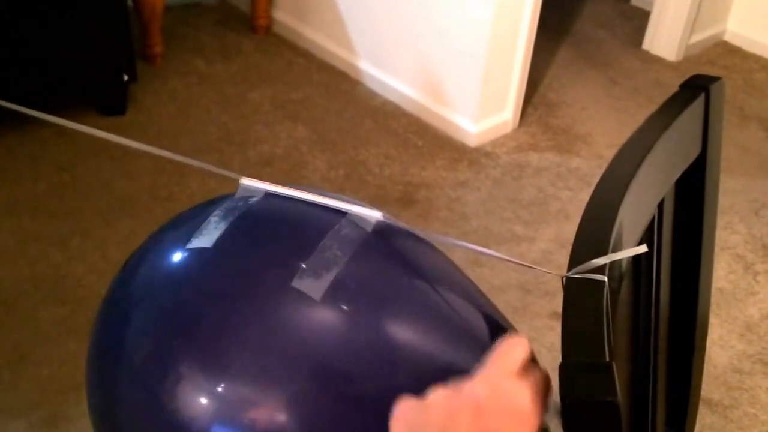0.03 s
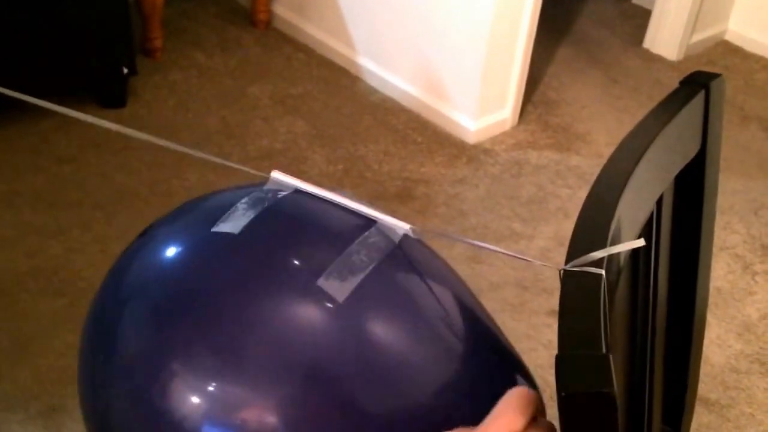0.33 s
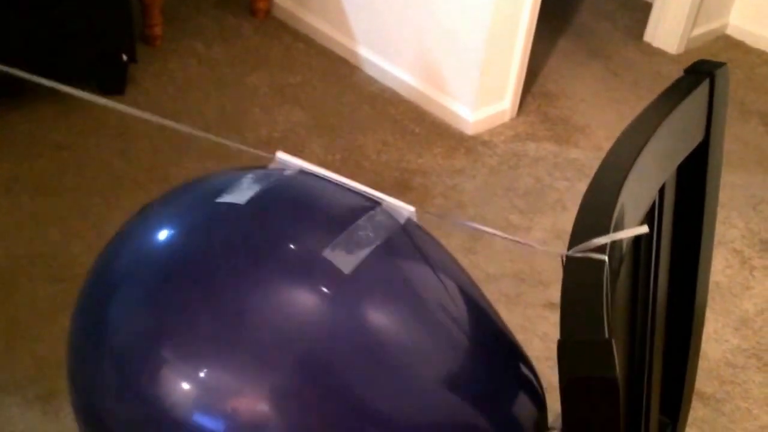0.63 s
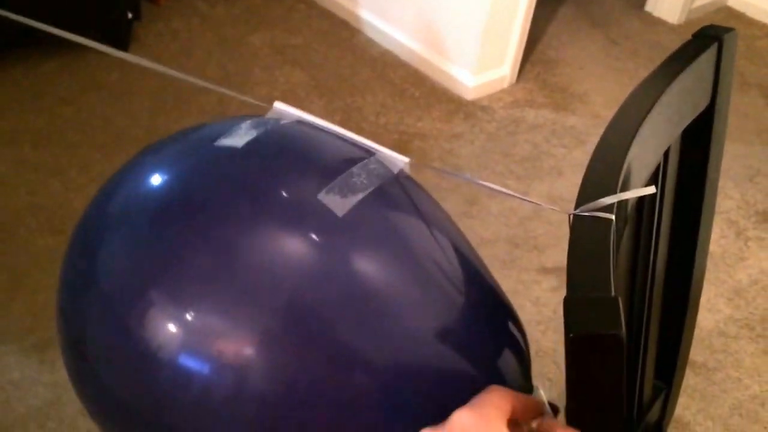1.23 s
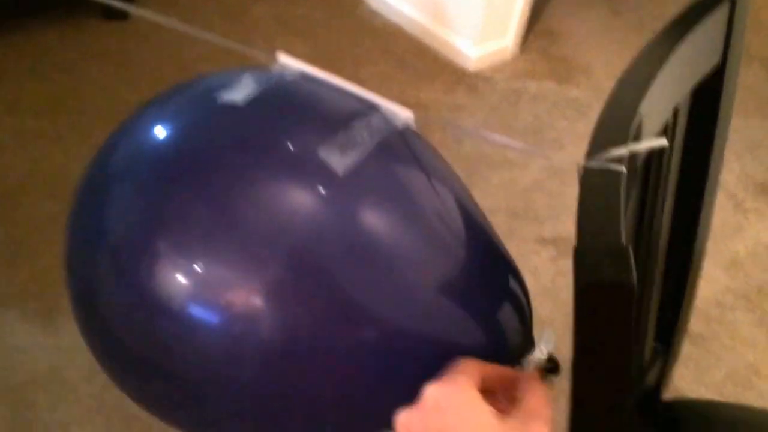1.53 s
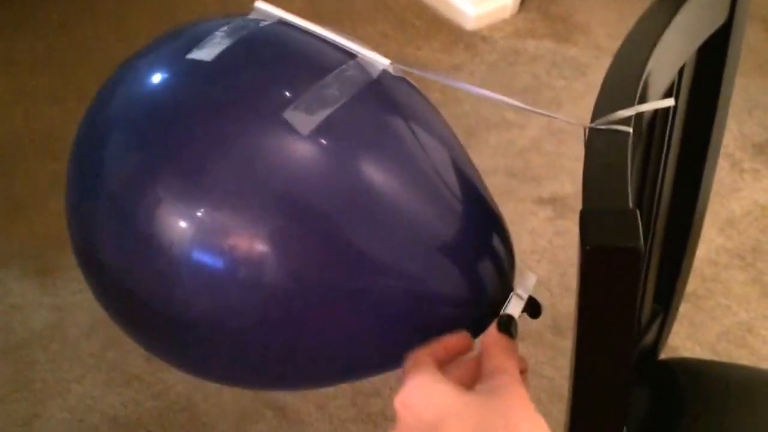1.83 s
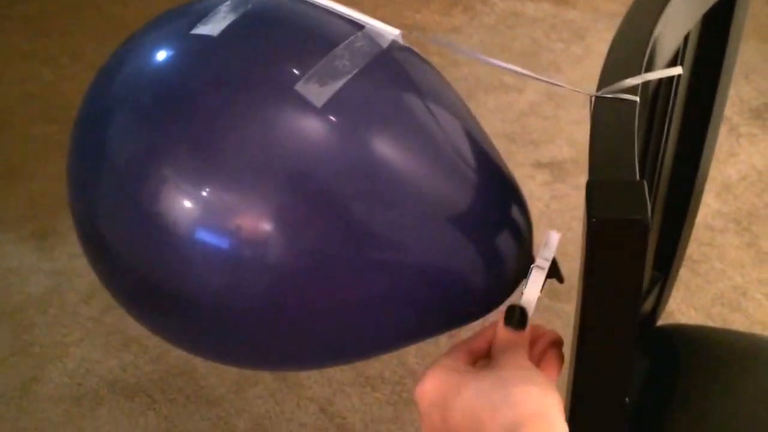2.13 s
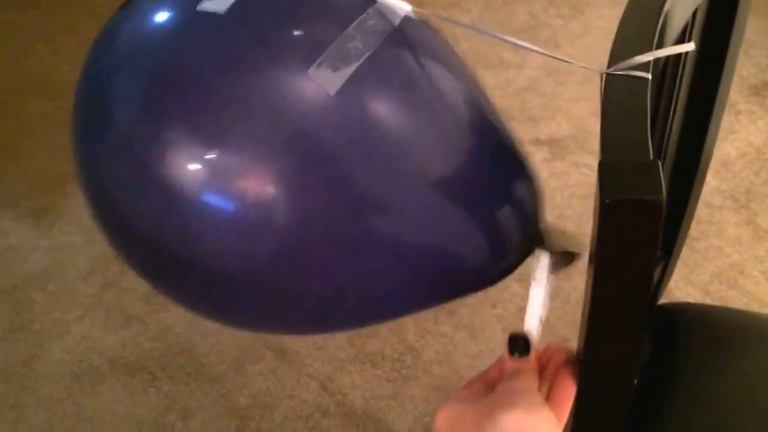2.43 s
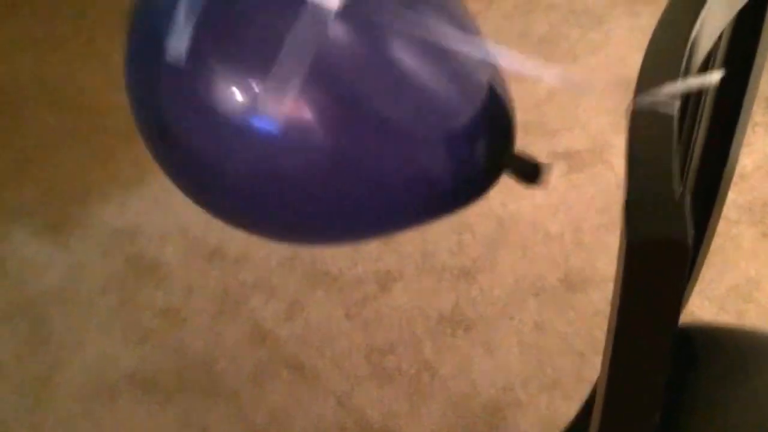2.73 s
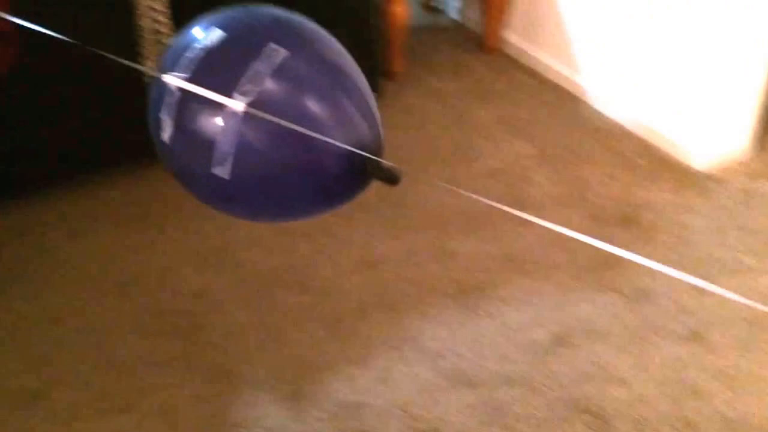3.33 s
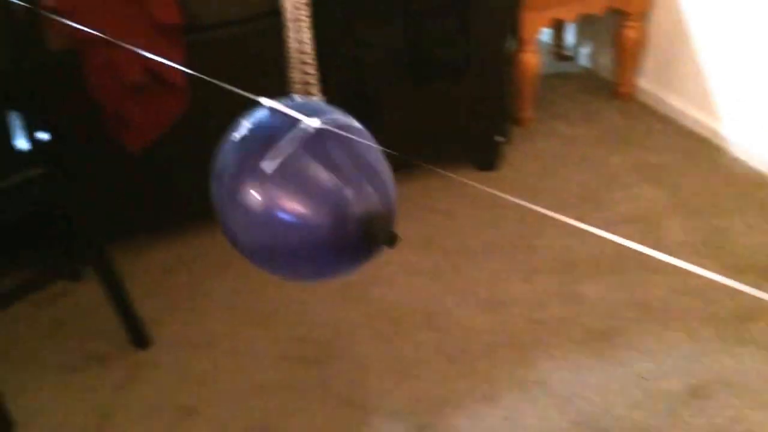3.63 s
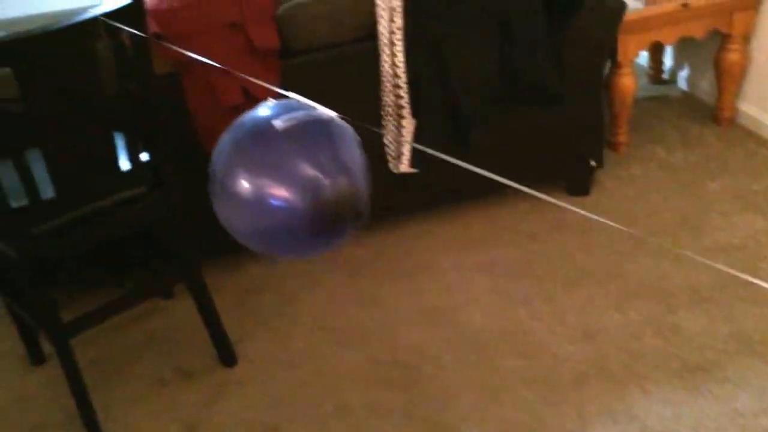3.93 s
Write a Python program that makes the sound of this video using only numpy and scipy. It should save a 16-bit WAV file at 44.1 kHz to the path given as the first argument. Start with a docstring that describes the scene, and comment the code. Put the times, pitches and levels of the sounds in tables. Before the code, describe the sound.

A balloon deflates with a sudden loud hiss and a rapid, raspy flutter that sinks in pitch. Before the release, fingers softly rub, tap and creak on the rubber, heard close up in a quiet room.

```python
"""A quiet carpeted room, where a balloon taped to a straw hangs on a string. Fingers handle it and unclip
its peg: friction makes the rubber rub, creak and squeak, and knocks excite the modes of the skin and
the air inside. The neck pops open and a turbulent jet hisses out. Then the loose neck flutters some
45 times a second, each flap a crack and a thump, sinking in pitch as the balloon empties."""
import sys
import numpy as np
from scipy import signal
from scipy.fft import rfft, irfft, next_fast_len
from scipy.io import wavfile
from scipy.ndimage import map_coordinates

SR = 44100
rng = np.random.default_rng(int(sys.argv[2]) if len(sys.argv) > 2 else 0)


def store_wav(level_fs):
    """Save 16-bit WAV to argv[1]."""
    pcm = np.round(np.clip(np.atleast_2d(level_fs), -1, 1) * 32767)
    wavfile.write(sys.argv[1], SR, pcm.T.astype(np.int16))


N = 176400
TIME = np.arange(N) / SR
POP_S, FLUTTER_START_S = 2.512, 2.653


def amp(db):
    """Amplitude ratio of a level in decibels."""
    return 10 ** (np.asarray(db) / 20)

def unit(x):
    """Normalisation to rms 1."""
    return x / np.sqrt(np.mean(x ** 2) + 1e-20)

def decay(t, t60_s):
    """Exponential damping, 60 dB in t60_s."""
    return np.exp(-np.log(1000) * t / t60_s)

def along(points, hz):
    """Interpolation of (frequency_hz, value) points on a logarithmic axis."""
    knots_hz, values = np.transpose(points)
    return np.interp(np.log(hz + 1), np.log(knots_hz + 1), values)

def curves(rows, t):
    """Linear interpolation in time of each column after the first."""
    times, *columns = np.transpose(rows)
    return [np.interp(t, times, column) for column in columns]

def wobble(rate_hz):
    """Random modulation: a spline through rate_hz Gaussian values a second."""
    knots = rng.standard_normal(int(N * rate_hz / SR) + 4)
    return map_coordinates(knots, [np.arange(N) * rate_hz / SR])

def filtered(x, response):
    """Linear filtering: the spectrum times a frequency response."""
    size = next_fast_len(N + SR // 2)
    return irfft(rfft(x, size) * response(np.fft.rfftfreq(size, 1 / SR)), size)[:N]

def resonant(x, modes):
    """Forced response of damped resonators in parallel."""
    return filtered(x, lambda f: sum(amp(db) * 1j * f * width / (hz ** 2 - f ** 2 + 1j * f * width)
                                     for hz, width, db in modes))

def coloured(x, spectrum, size=4096):
    """Minimum-phase filtering that keeps the power of white noise."""
    cepstrum = irfft(np.log(amp(along(spectrum, np.fft.rfftfreq(size, 1 / SR)))))
    cepstrum[1:size // 2] *= 2
    cepstrum[size // 2 + 1:] = 0
    impulse = irfft(np.exp(rfft(cepstrum)))
    return signal.fftconvolve(x, impulse / np.linalg.norm(impulse))[:N]

def noise(spectrum):
    """Coloured Gaussian noise of rms 1."""
    return unit(coloured(rng.standard_normal(N), spectrum))

def add(track, start_s, x):
    """Superposition of x on the track from start_s."""
    part = track[max(0, round(start_s * SR)):][:len(x)]
    part += x[:len(part)]

def burst(decay_s, size=1024):
    """A noise transient with the energy of its exponential envelope."""
    envelope = np.exp(-np.arange(size) / SR / decay_s)
    puff = envelope * rng.standard_normal(size)
    return puff * np.linalg.norm(envelope) / np.linalg.norm(puff)


# Background spectrum: frequency_hz, level_db
AMBIENT_SPECTRUM = [(15, -73), (25, -5), (90, -2.5), (264, -7), (415, -6.5), (621, -25), (903, -25.5),
                    (1670, -24), (7480, -27.5), (15000, -33)]

def ambience():
    """Stationary noise, mostly low, sets the room's noise floor."""
    return amp(-70.5) * noise(AMBIENT_SPECTRUM)


# Reverberation times: frequency_hz, t60_s
ROOM_DECAY = [(150, 0.57), (600, 0.33), (3000, 0.45), (7000, 0.31), (12000, 0.19)]

def reverberation(x):
    """Absorption damps the diffuse field, fastest in the high treble."""
    hz, t, spectra = signal.stft(rng.standard_normal(SR // 2), SR, nperseg=256)
    absorption = amp(-60 * t / along(ROOM_DECAY, hz)[:, None])
    tail = signal.istft(spectra * absorption, SR, nperseg=256)[1]
    tail = np.pad(tail, (SR // 200, 0))  # reflections arrive after 5 ms
    return signal.fftconvolve(x, tail / np.linalg.norm(tail))[:N]


# Strength of the rubbing: time_s, level_db
RUB_LEVELS = [(0.0, -69), (0.14, -50.5), (0.3, -63), (0.63, -51.5), (0.72, -57), (0.92, -58), (0.94, -50),
              (0.99, -40), (1.1, -62), (1.41, -56.5), (1.6, -67), (1.64, -63.5), (1.85, -53.5),
              (2.05, -61.5), (2.21, -57.5), (2.27, -61), (2.37, -52), (2.48, -42.5)]
# Friction spectrum: frequency_hz, level_db
RUB_SPECTRUM = [(25, -6), (80, 7), (200, 2.5), (280, -2), (420, -3.5), (650, -11), (1000, -9.5),
                (2000, -20.5), (6000, -25.5), (15000, -30)]
# Modes of the enclosed air: frequency_hz, bandwidth_hz, gain_db
CAVITY_MODES = [(353, 17, 1), (415.3, 20.6, 8.5), (505, 35, 3.5), (700, 26, 2.5), (910, 80, -2)]

def rubbing():
    """Uneven sliding friction of fingers on rubber drives the cavity resonances."""
    level_db, = curves(RUB_LEVELS, TIME)
    friction = unit(noise(RUB_SPECTRUM) * amp(2.76 * wobble(70)))
    rub = amp(level_db - 4.5) * friction * (TIME < POP_S)
    return rub + resonant(rub, CAVITY_MODES)


# Fingertip creaks: centre_s, half_length_s, level_db, pitch_hz
CREAK_EVENTS = [(0.159, 0.06, -64, 8800), (0.219, 0.0079, -60, 5300), (.26, 0.023, -60.5, 3500),
                (0.454, 0.032, -62, 3540), (0.638, 0.034, -58, 5870), (0.752, 0.022, -63, 5240),
                (0.94, 0.026, -60, 3250), (0.997, 0.013, -38.5, 7500), (1.275, 0.011, -65.5, 7600),
                (1.373, 0.015, -62, 4550), (1.708, 0.044, -71.5, 7250), (1.862, 0.061, -71, 5600),
                (1.97, 0.031, -62, 5100), (2.211, 0.033, -62, 5960), (2.437, 0.032, -81, 4000)]
# Spectrum of a creak: pitch_ratio, level_db
CREAK_SPECTRUM = [(.15, -3), (.7, -7), (1, -4.5), (1.3, -7), (2, -10.5), (4, -28)]

def creaks(slips_per_s=1600):
    """Stick-slip friction: a fingertip releases a short swell of tiny random impulses."""
    out = np.zeros(N)
    for centre_s, half_s, db, hz in CREAK_EVENTS:
        size = int(2 * half_s * SR)
        slips = rng.standard_normal(SR) * (0.11 + (rng.random(SR) < slips_per_s / SR))
        swell = unit(slips[:size]) * np.hanning(size)
        add(out, centre_s - half_s, amp(db) * coloured(swell, np.multiply(CREAK_SPECTRUM, [hz, 1])))
    return out


# Fingertip squeaks: start_s, length_s, level_db, pitch_hz
SQUEAK_EVENTS = [(0.428, 0.06, -68, 3160), (0.596, 0.018, -57, 5650), (0.736, 0.036, -72, 3140),
                 (0.938, 0.02, -63, 3000)]

def squeaks(bandwidth_hz=600, attack_s=0.003):
    """Friction-excited vibration: random modulation widens the rubber's tone into a rough, narrow band."""
    out = np.zeros(N)
    for start_s, length_s, db, hz in SQUEAK_EVENTS:
        t = TIME[:int(3 * length_s * SR)]
        grip = (wobble(bandwidth_hz) + 1j * wobble(bandwidth_hz))[:len(t)]
        tone = np.real(grip * np.exp(2j * np.pi * hz * t))
        envelope = (1 - np.exp(-t / attack_s)) * np.exp(-(t / length_s) ** 4)
        add(out, start_s, amp(db) * envelope * tone)
    return out


# Finger knocks, and near 0.98-1.0 s the low thumps of the peg snapping: start_s, level_db, pitch_hz
KNOCK_EVENTS = [(0.095, -41.5, 876), (.162, -30.5, 842), (.175, -36.5, 420), (0.198, -44, 443),
                (.466, -49, 1380), (.534, -48, 840), (0.83, -50, 1010), (.949, -28.5, 894),
                (.983, -36, 460), (0.993, -25.5, 387), (.996, -26.5, 221), (1.195, -46.5, 377),
                (1.253, -51, 365), (1.379, -45, 430), (1.646, -47, 385), (1.722, -45, 355),
                (1.84, -47, 374), (1.981, -47, 418), (2.223, -50, 930), (2.285, -30, 423),
                (2.386, -39, 402), (2.429, -34.5, 485), (2.468, -34, 450), (2.555, -19, 372)]
# Modes of the taut skin: pitch_ratio, level_db, t60_s
SKIN_MODES = [(1.002, -2, 0.028), (.5, -31, 0.072), (1.27, -16, 0.05), (1.6, -8.5, 0.01),
              (2.299, -21, 0.037), (3.698, -21.5, 0.016)]
# Spectrum of a knock's thud: frequency_hz, level_db
THUD_SPECTRUM = [(40, -2), (100, -0.5), (260, -9), (450, 10), (1100, -13.5), (2200, -17), (3300, -27),
                 (6000, -29), (15000, -40)]

def knocks():
    """Impact excites damped membrane modes over a dull thud; the enclosed air rings on in sympathy."""
    ring, thud = np.zeros((2, N))
    t = TIME[:SR // 5]
    for start_s, db, hz in KNOCK_EVENTS:
        for ratio, mode_db, t60_s in SKIN_MODES:
            strength = amp(db + mode_db + rng.normal(0, 0.5)) * rng.choice([-1, 1])
            add(ring, start_s, strength * decay(t, t60_s) * np.sin(2 * np.pi * hz * ratio * t))
        add(thud, start_s, amp(db - 7.5) * decay(t, t60_s=0.059) * rng.standard_normal(len(t)))
    return ring + amp(-12) * resonant(ring, CAVITY_MODES) + coloured(thud, THUD_SPECTRUM)


# Snaps of peg and rubber, and two sharp snaps of the neck as it starts to flap (2.6534 s, 2.726 s): start_s,
# level_db, pitch_hz
SNAP_EVENTS = [(0.6, -36, 5840), (.635, -45, 6400), (0.739, -52, 7700), (0.9927, -19, 6770),
               (2.224, -59, 5600), (2.283, -48.5, 3420), (2.285, -46.5, 7900), (2.6534, -13.5, 7100),
               (2.726, -13, 5960), (3.36, -24, 9200)]
# Spectrum of a snap: pitch_ratio, level_db
SNAP_SPECTRUM = [(.04, -4), (.4, -7), (.75, -10.5), (.88, 6), (1.1, 7), (1.25, -11), (1.42, -0.5),
                 (1.9, -4.5), (2.2, -9)]

def snaps():
    """Impulsive excitation: a very short click has a broad spectrum, here peaking near its pitch."""
    out = np.zeros(N)
    for start_s, db, hz in SNAP_EVENTS:
        click = burst(decay_s=0.00043)
        click[0] += 4  # sharp leading edge
        add(out, start_s, amp(db - 1.5) * coloured(click, np.multiply(SNAP_SPECTRUM, [hz, 1])))
    return out


# Strength of the jet: time_s, hiss_db, roar_db
JET_LEVELS = [(2.425, -77, -60), (2.486, -69, -40), (2.51, -25, -23), (2.57, -25, -26), (2.64, -29, -30.5),
              (2.68, -30.5, -29.5), (2.85, -34.5, -33), (3.1, -36, -35.5), (3.35, -40.5, -38),
              (3.62, -44, -41.5), (3.94, -41, -48), (4.0, -45, -44)]
# Spurts as the neck opens: centre_s, level_db, width_s
JET_SPURTS = [(2.511, -18.5, 0.00091), (2.524, -22, 0.0012), (2.586, -30.5, 0.0056), (2.626, -25, 0.0028)]
# Spectra of the hiss, the first rush and the roar: frequency_hz, level_db
HISS_SPECTRUM = [(500, -45.5), (1500, -6.5), (2700, -7.5), (3600, -1), (4600, 3), (5700, -3.5),
                 (7300, -6.5), (9500, -9.5), (15000, -24)]
RUSH_SPECTRUM = [(1000, -40), (3700, -19), (4900, 6), (5700, -7), (6500, -8), (7500, 0), (8800, -18),
                 (10500, -21), (15000, -14)]
ROAR_SPECTRUM = [(30, -26.5), (90, -6), (190, 1), (290, -6), (420, -4.5), (620, -13), (850, -12),
                 (1100, -14), (1400, -13.5), (1900, -21), (4000, -29.5)]

def jet(rush_fade_db_per_s=25, pop_width_s=0.00071):
    """The neck opens with a pressure pulse; turbulence radiates noise, brightest at full pressure."""
    hiss_db, roar_db = curves(JET_LEVELS, TIME)
    spurts = sum(amp(db) * np.exp(-((TIME - s) / width) ** 2 / 2) for s, db, width in JET_SPURTS)
    rush = amp(-5.5 - rush_fade_db_per_s * np.maximum(TIME - POP_S, 0)) * noise(RUSH_SPECTRUM)
    hiss_envelope = np.hypot(amp(hiss_db - 2), spurts)
    hiss = hiss_envelope * (noise(HISS_SPECTRUM) + rush) * unit(amp(2.5 * wobble(250)))
    roar_db += np.interp(TIME, [FLUTTER_START_S, 3.25], [-0.5, 0])
    roar = amp(roar_db) * unit(noise(ROAR_SPECTRUM) * amp(3.36 * wobble(120)))
    pop_time = (TIME - POP_S) / pop_width_s
    pop = amp(-14) * (pop_time ** 2 - 1) * np.exp(-pop_time ** 2 / 2)
    return (hiss + roar) * (TIME > JET_LEVELS[0][0]) + pop


def neck_hz(t, full_hz=345.8, empty_hz=196, sink_s=0.35):
    """The neck's natural frequency sinks exponentially as the balloon empties."""
    return empty_hz + (full_hz - empty_hz) * np.exp(-np.maximum(t - FLUTTER_START_S, 0) / sink_s)


# Resonances of the neck: pitch_ratio, level_db, bandwidth_hz
NECK_MODES = [(1.05, -9, 80.05), (2.1, -7.5, 180.1)]

def neck_resonance(fade_db_per_s=5.5):
    """Flow-excited resonance: the jet drives narrow noise bands that follow the neck's pitch."""
    phase = 2 * np.pi * np.cumsum(neck_hz(TIME)) / SR
    age_s = TIME - FLUTTER_START_S
    tone = sum(amp(db) * (wobble(width) * np.cos(ratio * phase) + wobble(width) * np.sin(ratio * phase))
               for ratio, db, width in NECK_MODES)
    _, roar_db = curves(JET_LEVELS, TIME)
    return tone * amp(roar_db - fade_db_per_s * age_s) * (age_s > 0)


# Flaps per second: time_s, rate_hz
FLUTTER_RATE = [(2.653, 55.33), (2.85, 50.5), (3.25, 45.49), (3.36, 41.34), (3.48, 45.07), (3.62, 40.17),
                (3.8, 41.96), (3.91, 44.44), (4, 38.55)]
# Strength of the flaps: time_s, crack_db, thump_db
FLAP_LEVELS = [(2.65, -31, -25.5), (2.85, -25, -27), (3.1, -29.5, -26), (3.3, -25.5, -26),
               (3.47, -28.5, -26), (3.6, -30, -33), (3.72, -29.5, -27), (3.88, -34, -30.5),
               (4.0, -35.5, -29)]
# Flaps that whip harder or softer: time_s, extra_crack_db, extra_tick_db
FLAP_ACCENTS = [(2.671, 8.5, -1), (2.71, 5, 11), (2.747, 6, 5), (2.801, 6, 8), (2.942, -1, 2),
                (2.981, 8, 4), (3.005, -14, 10.5), (3.215, 1, 6), (3.236, 5.5, 10), (3.281, 5, -5),
                (3.35, -1, 4), (3.375, 4, 5), (3.398, -7, 5), (3.582, -2.5, 6), (3.608, 0, 5.5),
                (3.657, 5.5, 0), (3.705, 2.5, 4.5), (3.872, 5, 6), (3.939, 5, 9)]
# Spectra of the crack and of the tick as the rubber lips meet: frequency_hz, level_db
CRACK_SPECTRUM = [(200, 3), (600, 3.5), (1400, 3.5), (2600, -2), (4500, -4), (7300, -3), (10000, -12),
                  (15000, -15)]
TICK_SPECTRUM = [(500, -38), (3000, -9), (5000, -10), (7400, 3.5), (9500, -2), (12000, -3), (15000, -4)]
# Low room modes: frequency_hz, bandwidth_hz, gain_db
ROOM_MODES = [(94.5, 4.7, 2.5), (136.7, 7.2, 5), (209.4, 15.2, 9.5), (300, 25, 3.5)]

def neck_flutter(crack_s=0.0008, tick_s=0.0007, gush_s=0.0053, slap_back_s=0.0037, low_cut_hz=75):
    """Flutter chops the jet: each flap gives a thump, a crack, a tick, a gush and a weaker slap back."""
    flutter_time = TIME[TIME >= FLUTTER_START_S]
    rate_hz, = curves(FLUTTER_RATE, flutter_time)
    cycles = np.cumsum(rate_hz) / SR
    flap_times = np.interp(np.arange(int(cycles[-1]) + 1), cycles, flutter_time)
    accents_db = rng.standard_normal((len(flap_times), 2)) * [2.9, 2.4]
    for time_s, *extra_db in FLAP_ACCENTS:
        accents_db[np.argmin(abs(flap_times - time_s))] = extra_db
    cracks, ticks, thumps = np.zeros((3, N))
    t = TIME[:SR // 10]
    gush = np.exp(-(t / gush_s) ** 2)  # air escapes while the lips stand open
    flaps = zip(flap_times, *curves(FLAP_LEVELS, flap_times), accents_db)
    for start_s, crack_db, thump_db, (extra_crack_db, extra_tick_db) in flaps:
        start_s += rng.normal(0, 0.0002)
        hz = neck_hz(start_s) * np.exp(rng.normal(0, 0.11))
        push = amp(thump_db + extra_crack_db / 2 + rng.normal(0, 1.54))
        thump = push * np.sin(2 * np.pi * hz * t) * decay(t, t60_s=0.026)
        add(thumps, start_s - 0.00042, thump)  # the push precedes the crack
        crack_gain, tick_gain = amp(crack_db + extra_crack_db), amp(crack_db + extra_tick_db - 3.5)
        add(cracks, start_s, crack_gain * amp(-11.5) * gush * rng.standard_normal(len(t)))
        add(ticks, start_s, tick_gain * amp(-12) * gush * rng.standard_normal(len(t)))
        rebound_s = start_s + slap_back_s * np.exp(rng.normal(0, 0.15))
        for slap_s, slap_db in (start_s, 0), (rebound_s, -10):
            add(cracks, slap_s, crack_gain * amp(slap_db) * burst(crack_s))
            add(ticks, slap_s + crack_s / 2, tick_gain * amp(slap_db / 2) * burst(tick_s))
    thumps = filtered(thumps, lambda f: 1 / np.sqrt(1 + (low_cut_hz / (f + 1)) ** 8))
    slaps = coloured(cracks, CRACK_SPECTRUM) + coloured(ticks, TICK_SPECTRUM)
    room = resonant(thumps, ROOM_MODES) + amp(-8) * reverberation(slaps + amp(5.5) * thumps)
    return slaps + thumps + room


def scene():
    """Superposition of the handling, the escaping air and the room's faint noise, in mono."""
    touches = knocks() + creaks() + squeaks()
    clicks = snaps()  # close, so drier than the touches
    handling = touches + clicks + reverberation(amp(-6.5) * touches + amp(-12.5) * clicks) + rubbing()
    return (handling + jet() + neck_resonance() + neck_flutter() + ambience())[None]

def record(dry, low_hz=55, top_hz=15400):
    """Band limiting: a gentle high-pass thins the deepest bass and a steep low-pass ends the treble."""
    return filtered(dry[0], lambda f: 1j * f / (low_hz + 1j * f) / np.sqrt(1 + (f / top_hz) ** 200))[None]


dry = scene()
out = record(dry)
store_wav(out)
```